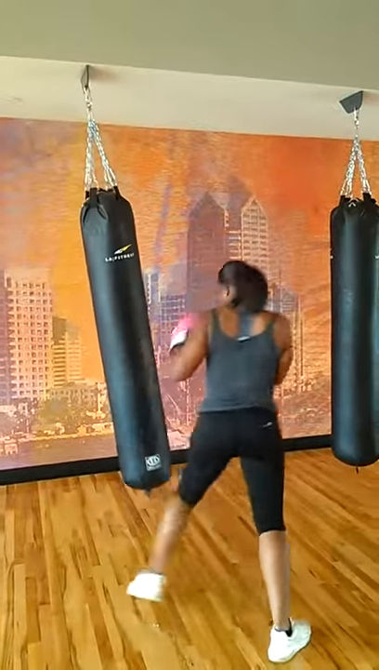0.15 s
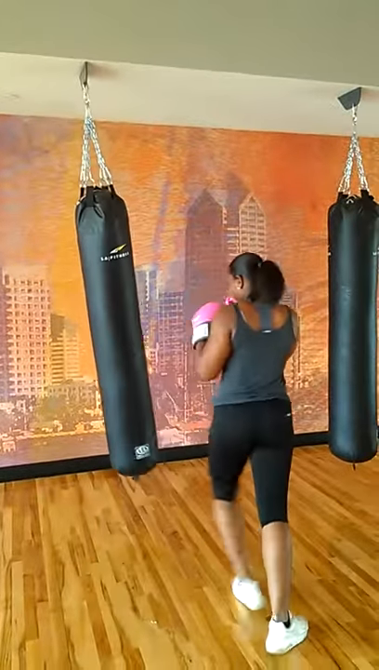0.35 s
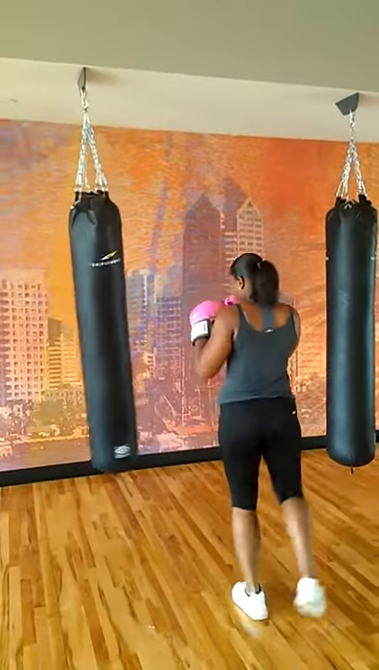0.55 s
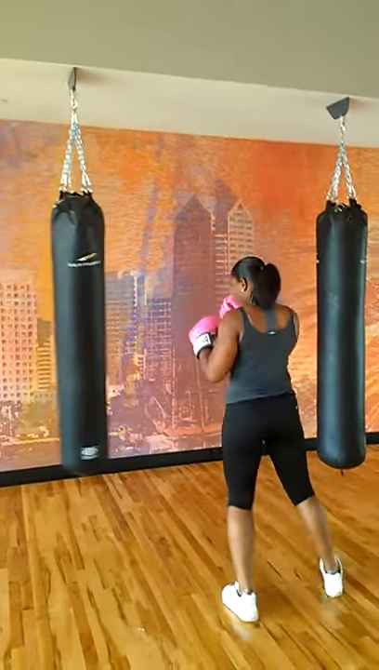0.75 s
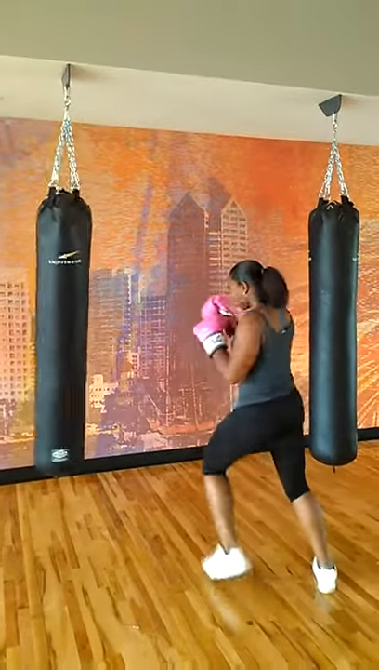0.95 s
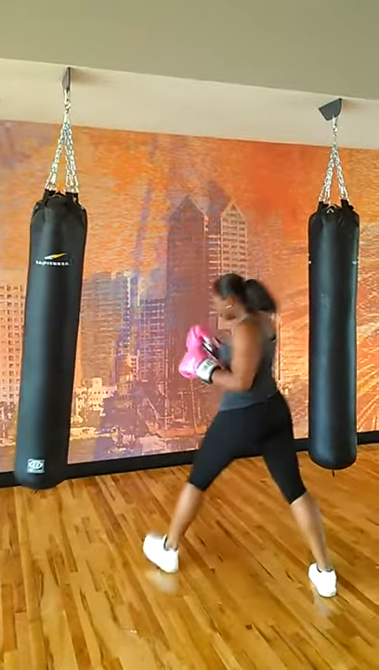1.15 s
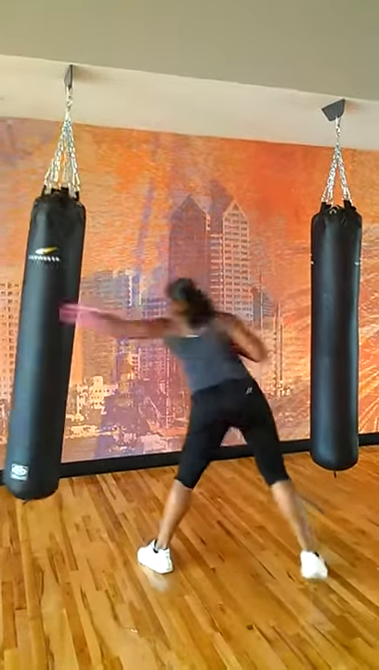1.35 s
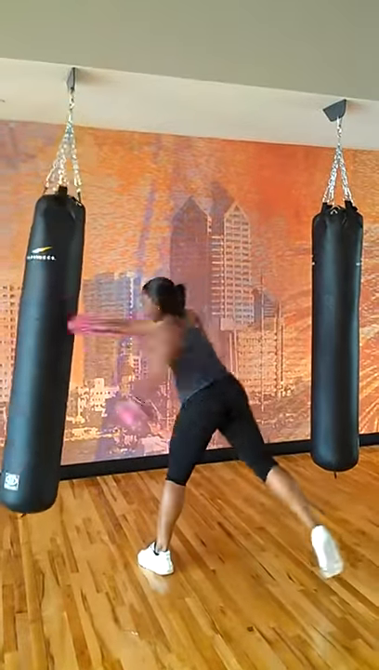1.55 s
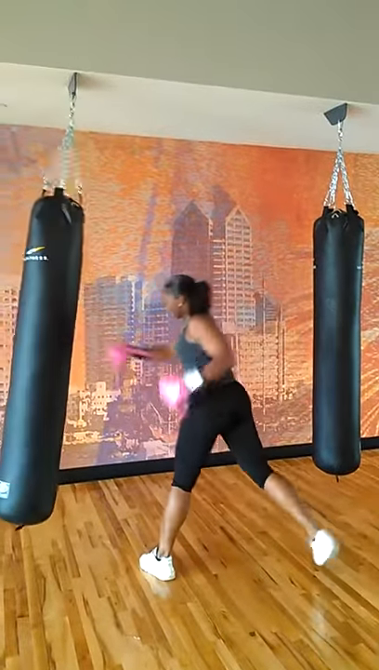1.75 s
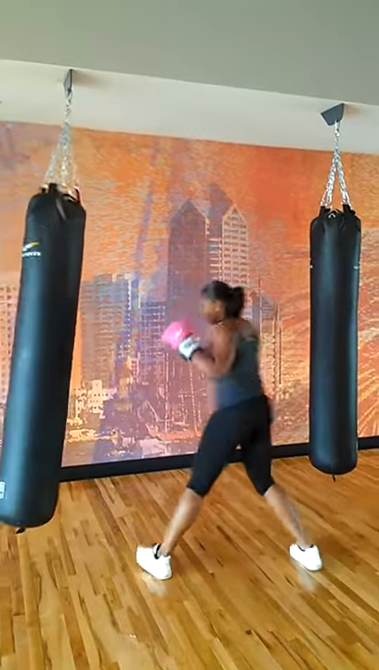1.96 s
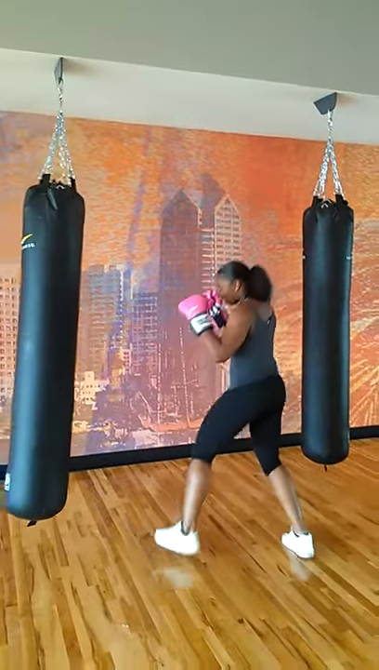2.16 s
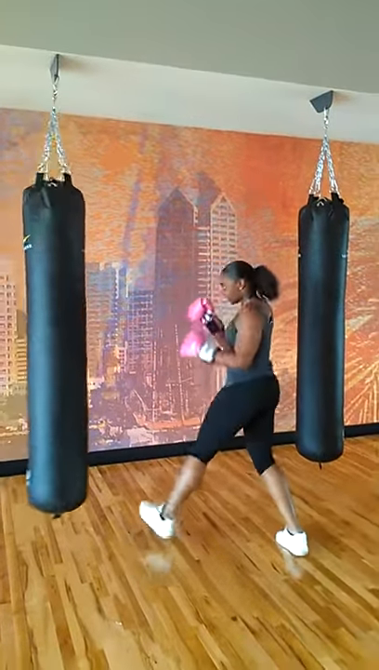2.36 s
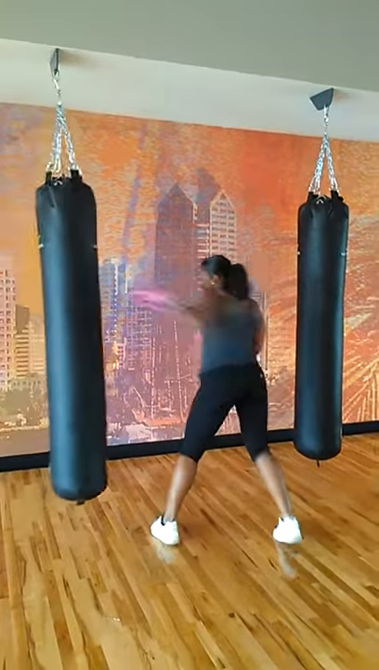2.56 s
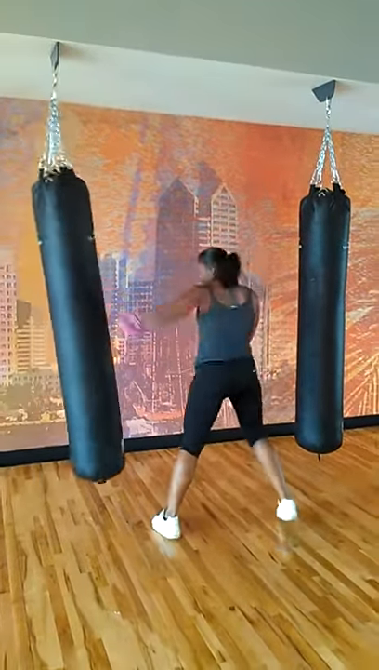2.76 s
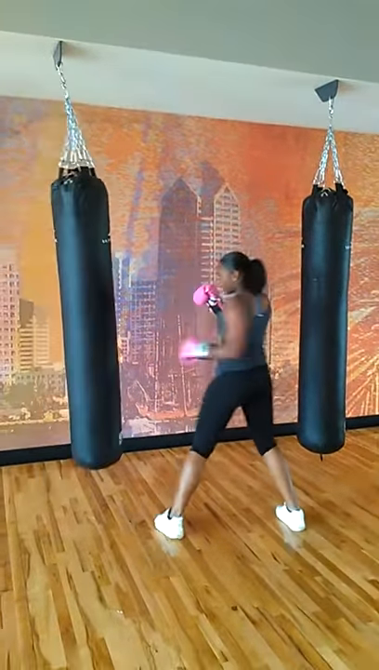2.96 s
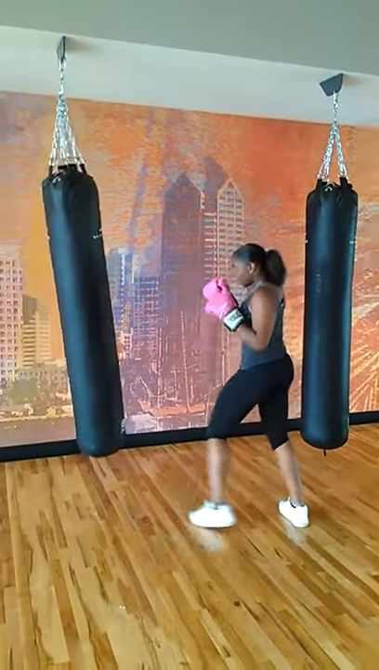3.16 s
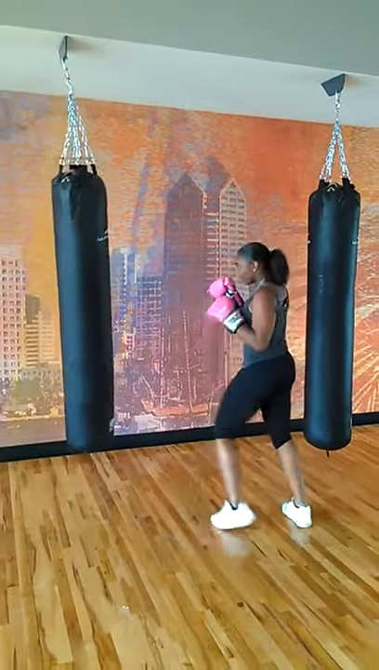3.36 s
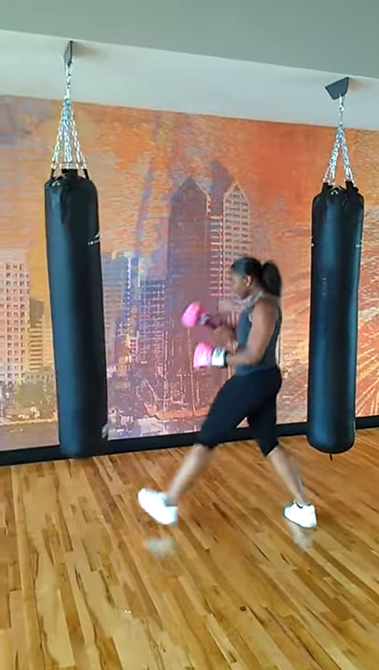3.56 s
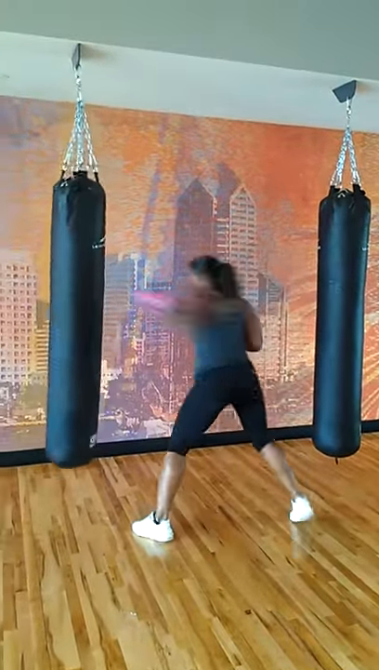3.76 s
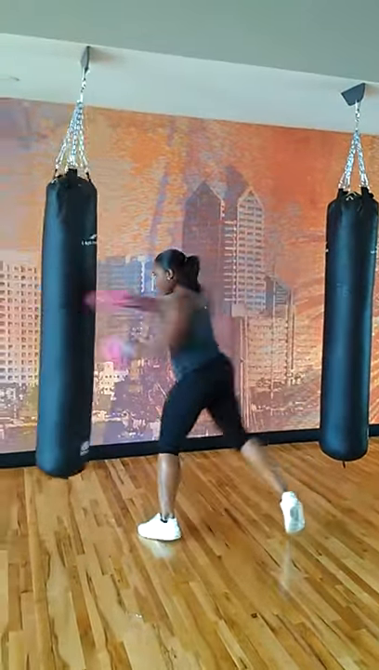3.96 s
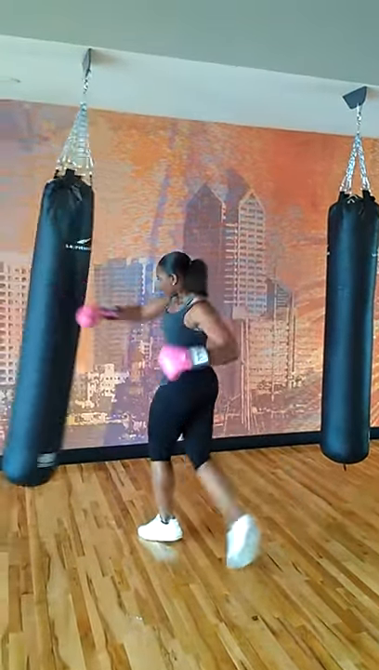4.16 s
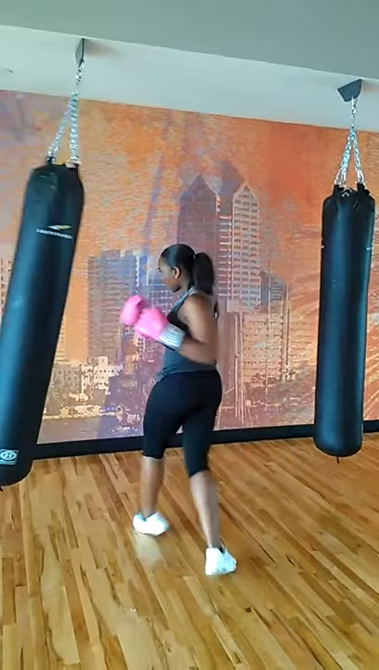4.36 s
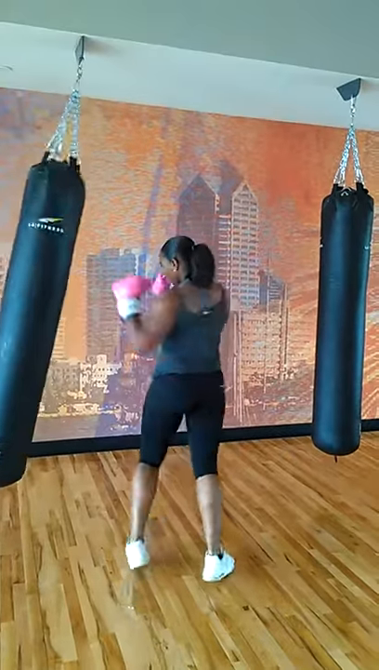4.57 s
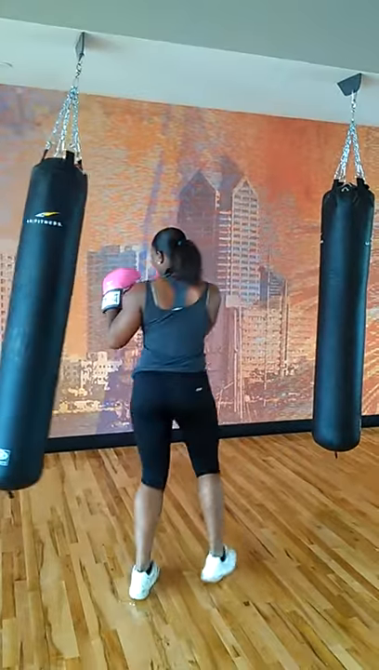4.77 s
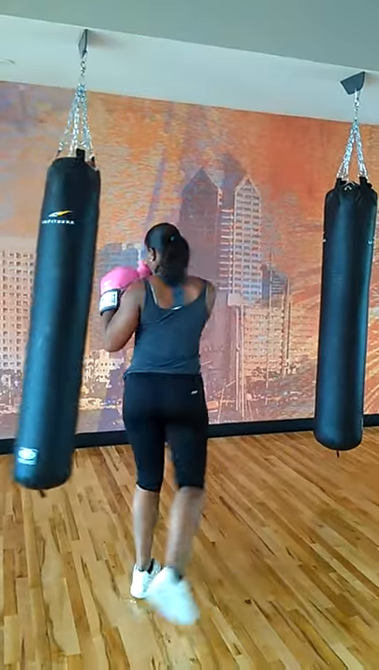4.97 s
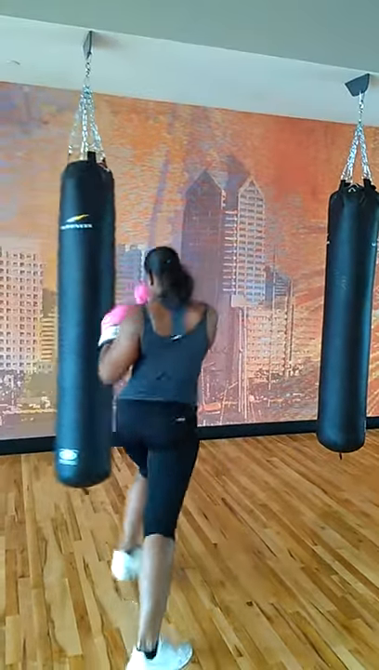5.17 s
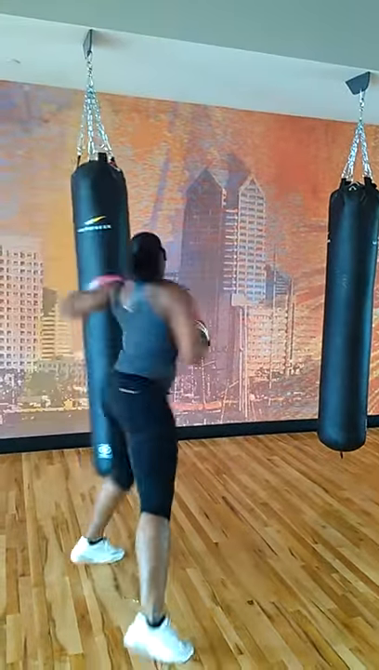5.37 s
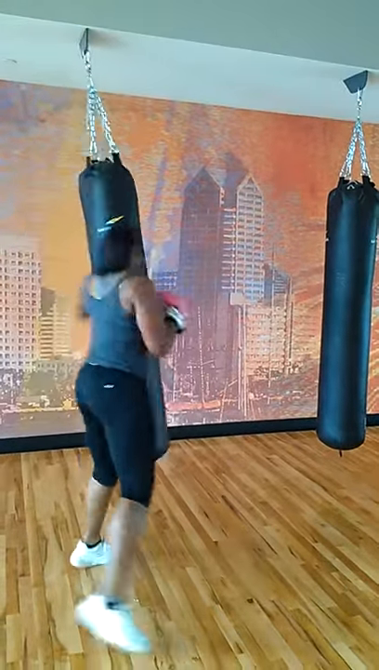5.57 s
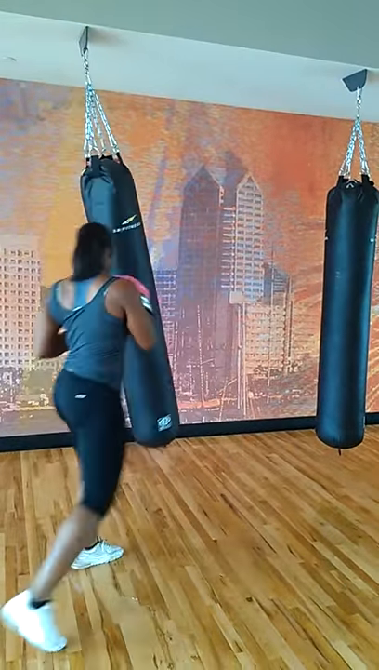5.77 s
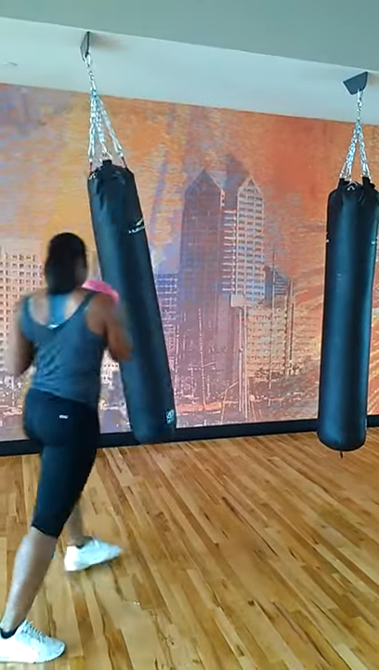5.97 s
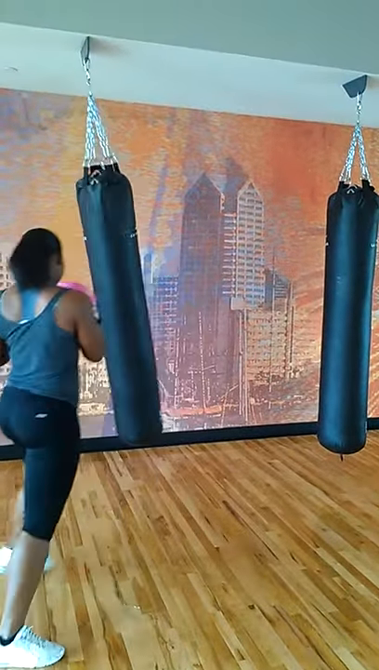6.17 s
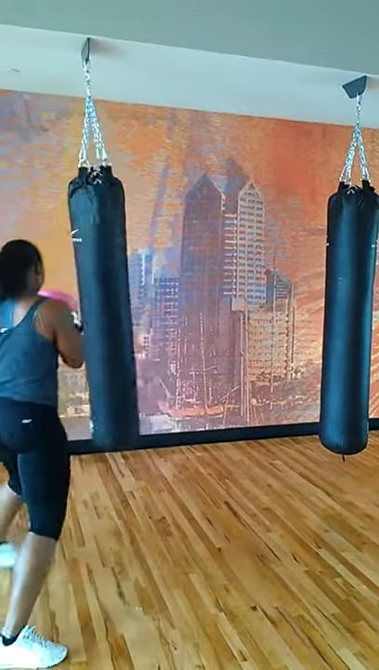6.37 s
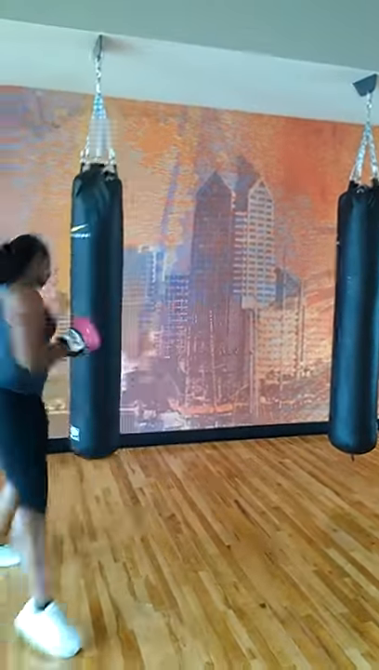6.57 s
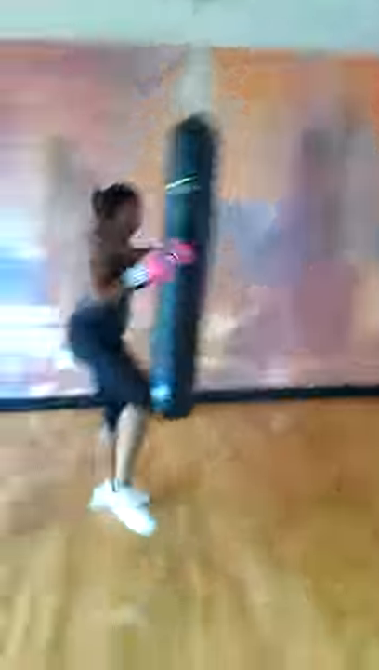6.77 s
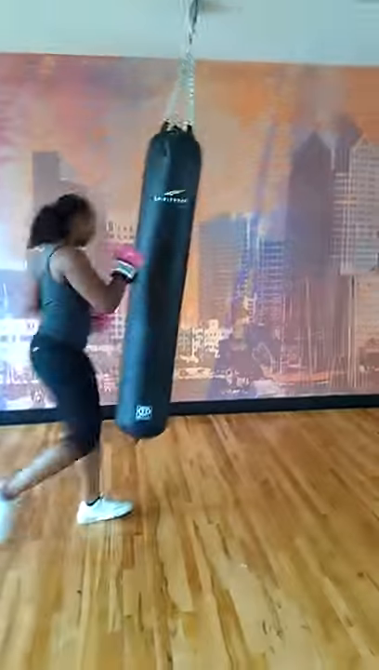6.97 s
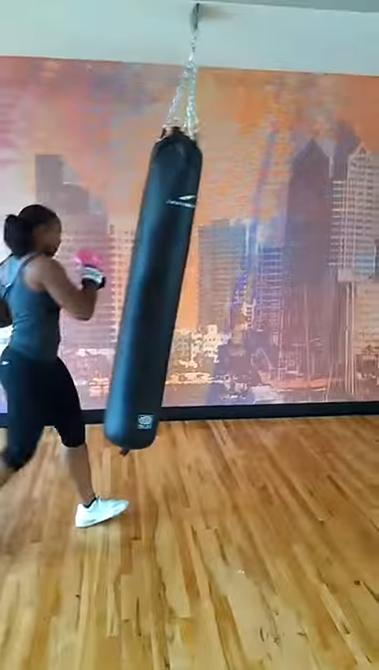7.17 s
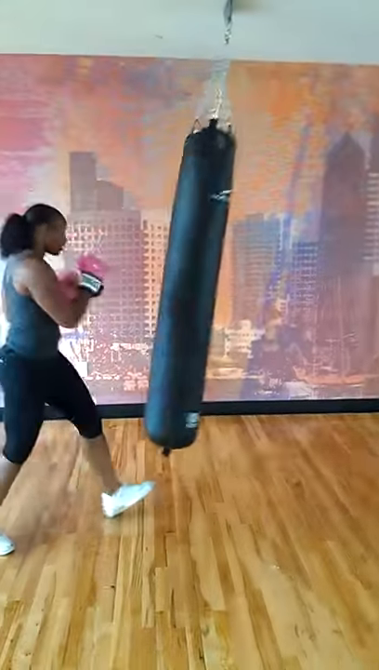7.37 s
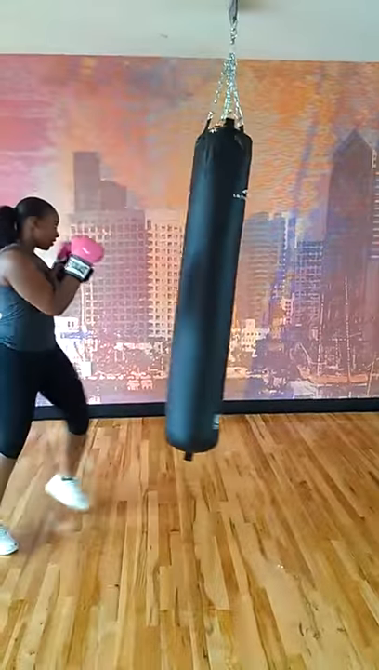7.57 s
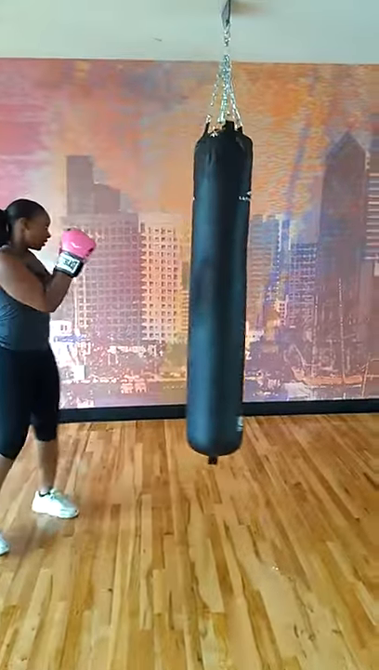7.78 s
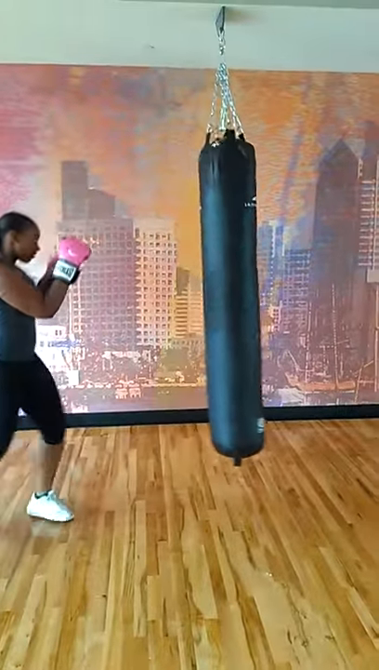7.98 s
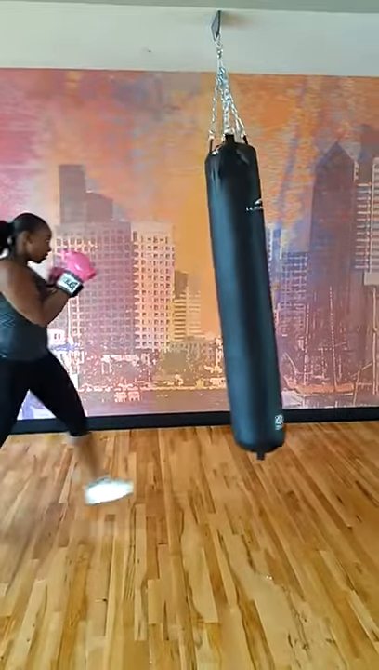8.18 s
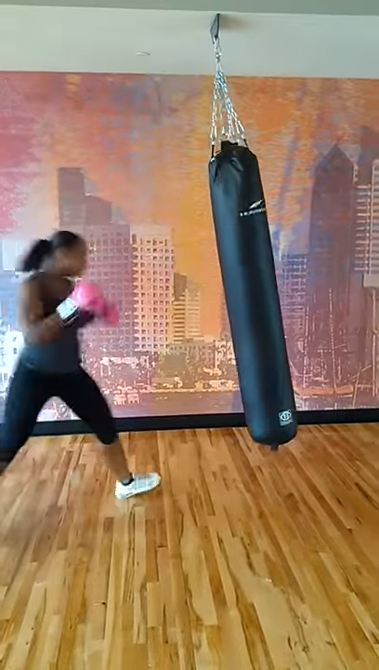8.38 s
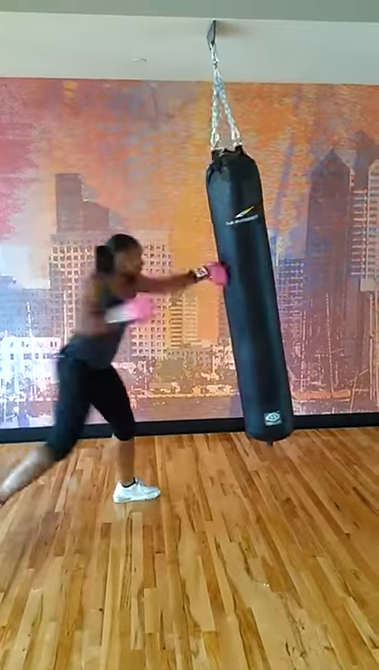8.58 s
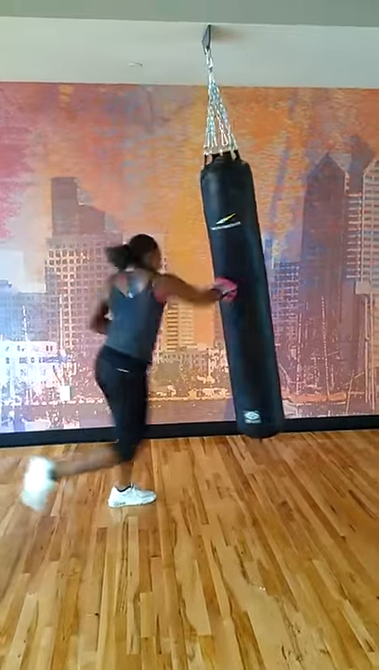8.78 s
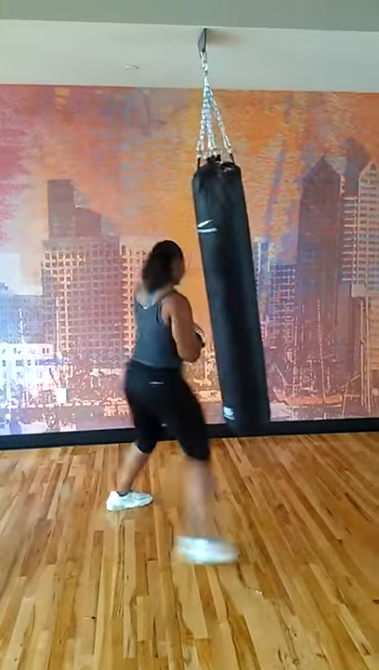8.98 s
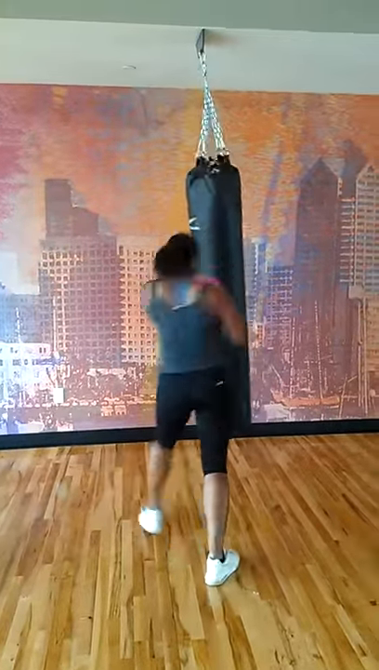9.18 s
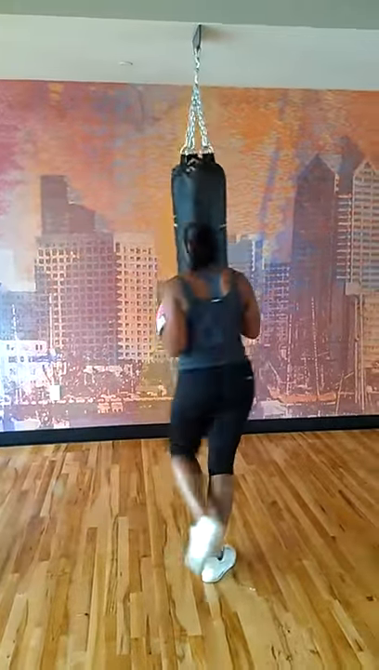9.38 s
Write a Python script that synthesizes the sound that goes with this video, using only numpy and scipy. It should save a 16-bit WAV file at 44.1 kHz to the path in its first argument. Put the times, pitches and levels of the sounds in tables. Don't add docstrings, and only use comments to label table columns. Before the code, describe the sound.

Boxing gloves crack and thud against a padded heavy bag in a bright, echoing room: a quick pair, then four separate strong blows, then a short break and a fast trio. Between them come sneaker taps, scuffs and small metallic chain clicks. Ventilation hush surges after each hit, then noise suppression pulls it almost to silence. The distant phone-like microphone gives a roomy, slightly diffuse stereo sound.

```python
import sys
import numpy as np
from scipy import signal
from scipy.fft import rfft, irfft, next_fast_len
from scipy.io import wavfile
from scipy.ndimage import uniform_filter1d

SR = 44100
rng = np.random.default_rng(int(sys.argv[2]) if len(sys.argv) > 2 else 0)


def amplitude_ratio(level_db):
    exponent = np.asarray(level_db, float) / 20
    return 10 ** exponent


def transcribe(signal):
    frames = np.atleast_2d(signal).T
    limited = np.clip(frames, -1, 1)
    pcm = np.round(limited * 32767).astype(np.int16)
    wavfile.write(sys.argv[1], SR, pcm)


N = 416304

# hz, level_db, t60_s
STEEL = [(2080, -4, 0.013), (4713, -13.5, 0.0071), (5820, -6, 0.0069), (7900, -11.5, 0.0073),
         (9300, -2, 0.0064), (10100, -7, 0.0047)]

SIZE = next_fast_len(N + 2 * SR)
BURST, LEAD, TAIL = 16384, 512, 65536
HZ = np.arange(SIZE // 2 + 1) * SR / SIZE + 1e-3
BURST_HZ = np.arange(BURST // 2 + 1) * SR / BURST + 1e-3
TAIL_HZ = np.arange(TAIL + 1) * SR / TAIL / 2 + 1e-3


def on_log(table, column, axis_hz=HZ):
    rows = np.array(table)
    return np.interp(np.log(axis_hz), np.log(rows[:, 0]), rows[:, column])


def shape(x, gain):
    return irfft(rfft(x, SIZE) * gain, SIZE)[..., :N]


def bell(hz, octaves, axis_hz=HZ):
    return np.exp(-.5 * (np.log2(axis_hz / hz) / octaves) ** 2)


def unit(x):
    return x / np.sqrt(np.mean(x ** 2))


def flicker(spread_db, hold_s=.034):
    hold = int(hold_s * SR)
    values = np.repeat(rng.standard_normal(N // 1000 + 1), hold)[:N]
    return amplitude_ratio(spread_db * uniform_filter1d(values, size=hold))


def suppressor():
    # start_s, level_db, treble_rel_db, creak_rel_db
    openings = [(0.0, -54.5, -7, -17), (0.46, -62.5, -6.5, -15), (0.51, -68, -7, -10),
                (1.25, -62.5, -6, -13), (1.608, -39.5, -6.5, -9.5), (2.22, -62, -3, -4),
                (2.53, -61.5, -5, -6), (2.656, -37.5, -4.5, -5), (2.96, -40.5, -3.5, -2.5),
                (3.3, -50.5, -6, -6), (3.576, -49, -8, -2), (3.73, -47.5, -16, -8.5), (3.87, -32, -9.5, -9),
                (4.4, -47, -5.5, -4.5), (4.87, -59.5, -8.5, -11), (5.19, -57.5, -9.5, -3.5),
                (5.36, -59.5, -15.5, -8.5), (5.47, -39, -5.5, -8), (6.22, -62.5, -6.5, -7),
                (6.435, -56, -8.5, -15), (6.73, -36.5, -12, -8), (7.26, -55.5, -6, -6),
                (7.882, -51, -11, -7), (8.04, -56.5, -5.5, -7), (8.3, -66, -12, -13), (8.39, -67, -10, -12),
                (8.47, -64, -11.5, -17), (8.56, -64, -8, -10), (8.6, -41.5, -9.5, -10),
                (9.06, -38, -9, -11)]
    # fully_open_s, level_db
    swells = [
        (.46, -62),
        (1.25, -62),
        (5.19, -58),
        (8.56, -64),
    ]
    open_s, shut_db, creep_db_per_s = 0.011, -87, 130
    sink_db_per_s, treble_sink_db_per_s = 33, 4.5
    knee_db, knee_steep = -68, 1.1
    t = np.arange(N) / SR - open_s / 2
    rows = np.array(openings)
    latest = np.maximum(np.searchsorted(rows[:, 0], t) - 1, 0)
    start_s, db, treble_db, creak_db = rows[latest].T
    db = db - sink_db_per_s * (t - start_s)
    db = np.maximum(db - knee_steep * np.maximum(knee_db - db, 0), shut_db)
    for full_s, full_db in swells:
        creep_db = full_db - creep_db_per_s * (full_s - t)
        db = np.maximum(db, np.where(t < full_s, creep_db, shut_db))
    levels = [db, treble_db - treble_sink_db_per_s * (t - start_s), creak_db]
    return uniform_filter1d(np.array(levels), int(open_s * SR) + 1, axis=1)


def hush():
    # hz, level_db_per_hz
    air_curve = [(59, -76.5), (100, -60.5), (233, -11), (263, -4), (366, -2.5), (542, -9), (754, -3.5),
                 (965, -10), (1790, -5), (2070, -5.5), (2880, -8.5), (8070, -6.5), (11200, -19.5),
                 (13800, -45.5)]
    # hz, width_hz, level_db
    ducts = [(278.4, 320, -10.5), (784, 190, -2.5)]
    db, treble_db, creak_db = suppressor()
    resonance = sum(amplitude_ratio(g) / (1 + ((HZ - f) / w * 2) ** 2) for f, w, g in ducts)
    air = amplitude_ratio(on_log(air_curve, 1)) * (1 + resonance)
    low, high = 0, 0
    for hz in 150 * 2 ** np.arange(0, 6.6, .5):
        band = shape(rng.standard_normal(N), air * bell(hz, 0.46))
        band = flicker(1.0) * flicker(2.2, hold_s=.12) * band
        if hz < 2700:
            low = low + band
        else:
            high = high + band
    rumble = amplitude_ratio(-108) * unit(shape(rng.standard_normal(N), bell(60, 1.1)))
    creak = 0
    for hz in (2050, 2180, 2320):
        creak = creak + flicker(3.8) * shape(rng.standard_normal(N), bell(hz, 0.049))
    mix = unit(low) + amplitude_ratio(treble_db + 4.5) * unit(high) + amplitude_ratio(creak_db - 1.0) * unit(creak)
    return amplitude_ratio(db - 1.5) * mix + rumble


def causal(gain):
    cepstrum = irfft(np.log(gain + 1e-9))
    half = len(cepstrum) // 2
    cepstrum[1:half] *= 2
    cepstrum[half + 1:] = 0
    return np.exp(rfft(cepstrum))


def smack(length_s, gain):
    spread = np.repeat(rng.exponential(size=BURST // 64 + 1), 32)
    delay_s = length_s * uniform_filter1d(spread, size=32)[:len(BURST_HZ)]
    phase = -2 * np.pi * np.cumsum(delay_s + LEAD / SR) * SR / BURST
    return irfft(causal(gain) * np.exp(1j * phase), BURST)


def ring(x, modes):
    out = 0
    for hz, db, t60_s in modes:
        r = np.exp(-np.log(1000) / (t60_s * SR))
        poles = [1, -2 * r * np.cos(2 * np.pi * hz / SR), r * r]
        out = out + amplitude_ratio(db) * np.sqrt(1 - r) * signal.lfilter([1, 0, -1], poles, x)
    return out


def add(out, start_s, x):
    i = int(start_s * SR) - LEAD
    out[i:i + len(x)] += x[:N - i]


def room(echo_db=0):
    # hz, first_t60_s, late_t60_s, late_rel_db
    decay_bands = [(250, 0.18, 1, -3), (500, 0.44, 1.24, -4), (1050, 0.48, 1.41, -13.5),
                   (2000, 0.61, 0.58, -47), (4000, 0.33, 0.82, -4), (8250, 0.46, 0.2, -6.5),
                   (12000, .3, 0.39, -10)]
    # delay_s, level_db, smear_s
    wall_echoes = [(.003, -3, 0.00079), (0.0114, 2.5, 0.0013), (.031, 8.5, 0.0029), (.039, 2, 0.0029),
                   (.061, 7, .002), (0.075, -2, .003)]
    t = np.arange(TAIL) / SR
    build = 1 - np.exp(-t / 0.0089)
    early = build
    for delay_s, db, smear_s in wall_echoes:
        early = early + amplitude_ratio(db + echo_db) * (t > delay_s) * np.exp(-np.maximum(t - delay_s, 0) / smear_s)
    grain = amplitude_ratio(4.5 * np.minimum(rng.exponential(size=TAIL), 3.2) * np.exp(-t / 0.16))
    grain = grain / np.sqrt(uniform_filter1d(grain ** 2, size=2000))
    noise = rfft(rng.standard_normal(TAIL) * grain, 2 * TAIL)
    total = sum(bell(row[0], .45, TAIL_HZ) for row in decay_bands) + 1e-9
    out = 0
    for hz, first_t60_s, late_t60_s, late_db in decay_bands:
        decay = amplitude_ratio(-60 * t / first_t60_s) * early + amplitude_ratio(late_db - 60 * t / late_t60_s) * build
        beating = np.repeat(rng.standard_normal(TAIL // 512), 512)
        decay = decay * amplitude_ratio(2.5 * uniform_filter1d(beating, size=512))
        out = out + irfft(noise * bell(hz, .45, TAIL_HZ) / total)[:TAIL] * decay
    return out / np.sqrt(np.sum(out ** 2))


def links():
    # start_s, level_db, brightest_hz; 2.975, 5.797 and 6.266 are far-wall echoes of the knock some 30 ms before
    knocks = [(0.139, -53, 8950), (0.419, -51, 8880), (2.775, -12, 9000), (2.95, -24, 8400),
              (2.975, -18, 7700), (3.11, -38, 9000), (3.179, -40.5, 7700), (3.22, -38, 9500),
              (4.354, -26.5, 7440), (4.566, -45.5, 8200), (4.866, -42.5, 8550), (4.899, -49, 7720),
              (5.178, -53.5, 7870), (5.766, -27, 8010), (5.797, -24.5, 6600), (6.014, -40.5, 7420),
              (6.232, -52.5, 9620), (6.266, -48, 7800), (6.619, -52, 8310), (7.262, -48.5, 8718),
              (7.409, -54.5, 9490), (7.619, -60, 9230), (7.912, -49, 8800), (8.043, -40, 5300),
              (8.063, -39.5, 8040)]
    # start_s, hz, level_db, t60_s
    hook_rings = [
        (6.438, 6126, -47, .17),
        (6.47, 5912, -58, .15),
    ]
    out = np.zeros((2, N))
    for start_s, db, hz in knocks:
        tick = smack(.002, bell(hz, 0.13, BURST_HZ) + 0.16 * bell(4000, 1.0, BURST_HZ))
        steel = ring(smack(0.0022, 1 / (1 + (BURST_HZ / 10500) ** 12)), STEEL)
        knock = amplitude_ratio(db) * (amplitude_ratio(23) * tick + amplitude_ratio(10) * steel)
        add(out[0], start_s, knock)
        add(out[1], start_s, amplitude_ratio(-3) * knock)
    t = np.arange(SR // 2) / SR
    for start_s, hz, db, t60_s in hook_rings:
        hook = amplitude_ratio(db) * np.sin(2 * np.pi * hz * t) * np.exp(-np.log(1000) * t / t60_s)
        add(out[0], start_s + LEAD / SR, hook)
        add(out[1], start_s + LEAD / SR, 0.83 * hook)
    return out


def steps():
    treads = [(1.229, -57.5, 757, -3), (2.529, -54, 1705, -8), (2.899, -29.5, 371, -5.5),
              (3.319, -43, 753, -15.5), (3.578, -32, 723, -16), (3.725, -26.5, 948, -8),
              (3.734, -30.5, 1220, -7.5), (3.761, -35, 1160, -3), (4.029, -12, 753, -16),
              (4.199, -27, 351, -16.5), (4.352, -37, 705, -7.5), (5.069, -54.5, 1810, -18.5),
              (5.146, -52.5, 694, -14), (5.175, -45, 1678, -13), (5.354, -40, 950, -19.5),
              (5.709, -26.5, 447, -11.5), (6.428, -47, 1180, -20), (6.461, -46, 905, -7.5),
              (6.576, -47.5, 1720, -18), (7.886, -44, 2200, -22), (7.965, -46, 1500, -20),
              (8.034, -41, 1370, 1), (8.063, -43, 2190, 0.5), (8.477, -52, 449, -24),
              (8.586, -46, 1500, -6), (8.6, -13, 624, -11), (9.009, -27, 756, -21)]
    out = np.zeros((2, N))
    for start_s, db, hz, scuff_db in treads:
        sole = bell(hz, 0.29, BURST_HZ) + 0.32 * bell(1000, 1.2, BURST_HZ)
        scuff = amplitude_ratio(scuff_db + 1) * bell(3400, 0.39, BURST_HZ)
        tap = amplitude_ratio(db + 24) * smack(0.0015, (sole + scuff) / (1 + (260 / BURST_HZ) ** 8))
        add(out[0], start_s + .002, tap)
        add(out[1], start_s + .002, amplitude_ratio(-.8) * tap)
    return out


def crackle(length_s, spiky_db):
    t = np.arange(BURST) / SR / max(length_s, .0005)
    size = amplitude_ratio(spiky_db * np.minimum(rng.exponential(size=BURST), 4))
    x = np.roll(rng.standard_normal(BURST) * size * t * np.exp(-t), LEAD)
    return x / np.sqrt(np.sum(x ** 2))


def punches():
    # start_s, blow_db, crack_rel_db, straight_rel_db, thud_hz
    blows = [
        (1.423, -5, -2.5, -15.5, 724),
        (1.604, -11, -4, -6.5, 770),
        (2.65, 0, -9.5, -16.5, 597),
        (3.865, 3.5, -8.5, -18, 549),
        (5.466, -1, -2.5, -17.5, 605),
        (6.728, 1, -12, -18.5, 546),
        (8.605, -11.5, -0.5, -7.5, 606),
        (8.767, -7, -1, -9.5, 740),
        (9.06, -11, -2, -11.5, 618),
    ]
    facing_db = [1, -2, -.5, -2, 0, 1.5, -1, -3, -5]
    # hz, level_db_per_hz
    slap_curve = [(59, -72.5), (100, -45.5), (248, -22.5), (298, -9), (366, -12.5), (432, -12.5),
                  (577, -9.5), (1030, -2), (1210, -3), (1950, 2), (6980, -4.5), (7900, 1.5), (10800, -12.5),
                  (13800, -37.5)]
    out, f = np.zeros((2, N)), BURST_HZ
    slap = irfft(causal(amplitude_ratio(on_log(slap_curve, 1, f))))[:1024]
    for (start_s, db, crack_db, straight_db, thud_hz), echo_db in zip(blows, facing_db):
        padding = amplitude_ratio(8) / (1 + (f / 550) ** 4)
        crack = amplitude_ratio(crack_db + 4.5) / (1 + (5500 / f) ** 4)
        glove = smack(.0015, padding + bell(1700, 1.87, f) + crack)
        thud_modes = [(thud_hz, 0, .05), (1.6 * thud_hz, -3, .035), (.62 * thud_hz, -3, .07)]
        body = amplitude_ratio(-7.5) * ring(glove, thud_modes)
        floor_bounce = amplitude_ratio(-2.5) * np.roll(glove, int(.0035 * SR))
        near = glove + body + floor_bounce
        chain = amplitude_ratio(-2.5 + 0.92 * db) * crackle(0.032 + 0.0058 * db, 2.2)
        rattle = irfft(rfft(chain) / (1 + (3500 / f) ** 3)) + amplitude_ratio(-19) * ring(chain, STEEL)
        for ear in out:
            walls = irfft(rfft(glove + rattle, 2 * TAIL) * rfft(room(echo_db), 2 * TAIL))
            heard = walls + amplitude_ratio(straight_db) * np.pad(near, (0, 2 * TAIL - BURST))
            add(ear, start_s, amplitude_ratio(db + 23) * signal.fftconvolve(heard, slap))
    return out


def scene():
    feed, straight = links() + steps()
    hearings = [shape(feed, rfft(room(), SIZE)) + straight + hush() for _ in range(2)]
    return punches() + np.array(hearings)


def low_pass(x):
    return signal.sosfilt(signal.butter(12, 13940, fs=SR, output="sos"), x)


def record(dry):
    # hz, phase_lead_rad, unlike_share (0-1), level_db
    copy_curve = [(200, .1, 0.02, 0.6), (600, .4, 0, -1.4), (1200, .2, .15, -2), (2200, .3, 0, -2),
                  (4000, -.1, .4, -2), (8000, -.2, 0.98, -3), (12000, -.3, 0.7, -1.5)]
    # start_s, end_s
    dropout = (6.714, 6.726)
    lag, headroom = 72, 1.7
    unlike = np.clip(on_log(copy_curve, 2), 0, 1)
    phase = on_log(copy_curve, 1) - 2 * np.pi * HZ * lag / SR
    late = amplitude_ratio(on_log(copy_curve, 3)) * np.exp(1j * phase)
    side = -shape(dry[0], late * np.sqrt(1 - unlike)) - shape(dry[1], late * np.sqrt(unlike))
    t = np.arange(N) / SR
    gate = uniform_filter1d(1. - (t > dropout[0]) * (t < dropout[1]), size=60)
    x = np.array([dry[0] + side, dry[0] - side])
    thump = amplitude_ratio(-39) * shape(np.abs(x), bell(60, 0.92))
    x = gate * (x + thump)
    return low_pass(headroom * np.tanh(x / headroom))


dry = scene()
out = record(dry)
transcribe(out)
```